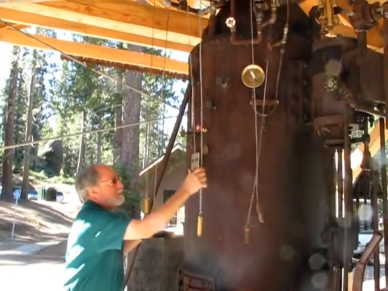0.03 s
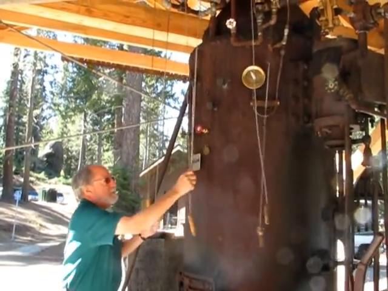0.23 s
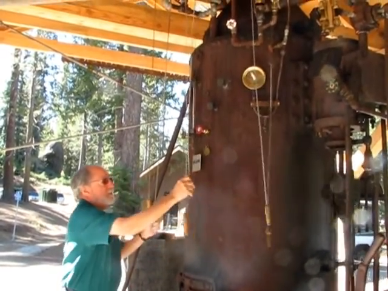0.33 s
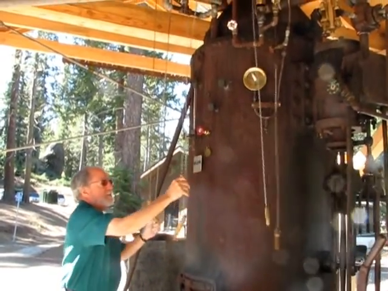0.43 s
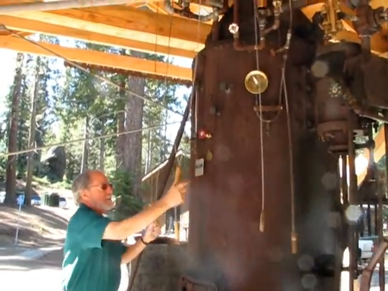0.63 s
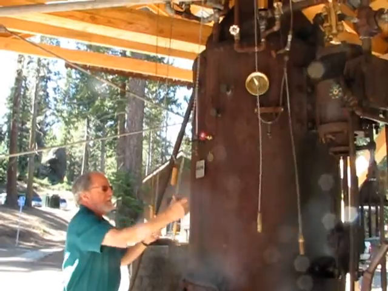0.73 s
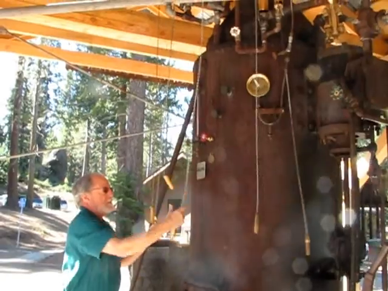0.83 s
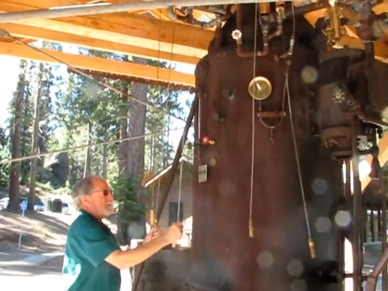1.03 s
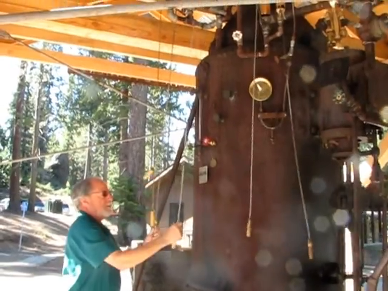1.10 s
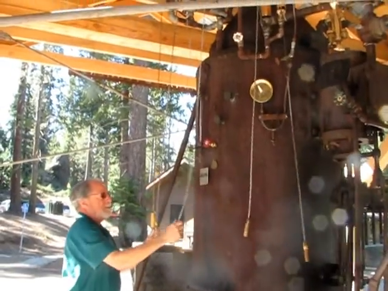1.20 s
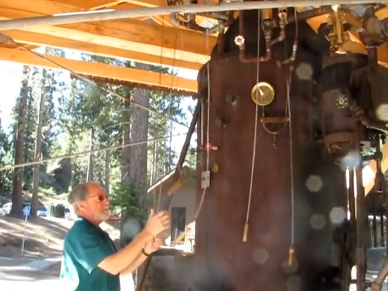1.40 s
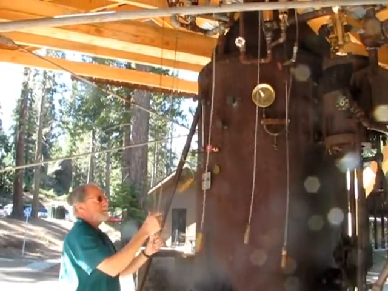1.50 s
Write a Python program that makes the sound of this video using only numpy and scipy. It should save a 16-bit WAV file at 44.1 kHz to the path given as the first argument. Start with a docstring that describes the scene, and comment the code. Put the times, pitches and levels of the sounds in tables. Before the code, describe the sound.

Wet steam gurgles and hisses, then two short whistle toots sound, the first chordal, the second higher and purer. Each leaves a trembling echo under an open shed in woods, captured by a slightly distorting small microphone.

```python
"""Two steam-whistle blasts

An old upright boiler under an open shed among trees: a three-bell chime, then a single brighter whistle.
Bells are sums of harmonics with a bending, trembling pitch; steam jets and wet sputter are shaped noise.
Each tone lingers in shed and forest as a fluttering, decaying copy of its harmonics.
The sum overloads a small camera's input, which samples coarsely and limits the band.
"""
import sys
import numpy as np
from scipy import signal
from scipy.fft import rfft, irfft
from scipy.io import wavfile

SR = 44100
rng = np.random.default_rng(int(sys.argv[2]) if len(sys.argv) > 2 else 0)


def log_audio(samples):
    """Write samples as a 16-bit WAV file to the path given in sys.argv[1]."""
    # one column per channel
    frames = np.atleast_2d(samples).T
    # limit to full scale, then quantise
    limited = np.clip(frames, -1, 1)
    pcm = np.round(limited * 32767).astype(np.int16)
    wavfile.write(sys.argv[1], SR, pcm)


N = 68355
T = np.arange(N) / SR


def amp(db):
    """Decibels to gain."""
    return 10 ** (np.asarray(db) / 20)


def unit(x):
    """Scale to rms 1."""
    return x / np.sqrt(np.mean(abs(x) ** 2) + 1e-20)


def colour(x, points):
    """Filter by (frequency [Hz], gain [dB]) points, joined on a log frequency axis."""
    hz, db = np.transpose(points)
    bins_hz = np.fft.rfftfreq(N, 1 / SR)
    gain_db = np.interp(np.log1p(bins_hz), np.log1p(abs(hz)), db)
    return irfft(rfft(x) * amp(gain_db), N)


def drift(rate_hz):
    """Smooth random motion of rms 1, up to about the given rate."""
    lowpass = 1 / (1 + (np.fft.rfftfreq(N, 1 / SR) / rate_hz) ** 4)
    return unit(irfft(rfft(rng.standard_normal(N)) * lowpass, N))


def noise(points, skirts=False):
    """Noise of rms 1 with the given spectrum; skirts make it fade beyond the end points."""
    if skirts:
        points = [(points[0][0] / 2, -70), *points, (points[-1][0] * 2, -70)]
    return unit(colour(rng.standard_normal(N), points))


def after(start_s):
    """Seconds gone since start_s, 0 before."""
    return np.maximum(T - start_s, 0)


def rise(start_s, time_s):
    """Smooth climb from 0 to 1."""
    return 1 - np.exp(-(after(start_s) / time_s) ** 2.0)


def swell(middle_s, length_s):
    """One soft arch, peak 1."""
    return np.cos(np.pi * np.clip((T - middle_s) / length_s, -.5, .5))


# outdoor rumble spectrum: (frequency [Hz], level [dB per Hz])
RUMBLE_SPECTRUM = [(15, -3), (40, -3), (90, -15.5), (200, -16), (600, -29.5)]
RUMBLE_DB = -48.5


def rumble():
    """Steady low outdoor noise."""
    return amp(RUMBLE_DB) * noise(RUMBLE_SPECTRUM)


# steam noise as heard, lower while a whistle sounds: (time [s], low sputter [dB], middle [dB], hiss [dB])
STEAM_LEVELS = [(0, -48.5, -43.5, -47), (.04, -33, -36.5, -43), (.12, -34, -38.5, -48),
                (.17, -29.5, -34, -42), (.24, -27.5, -28, -43), (.31, -24, -31, -41),
                (.345, -37.5, -32, -48), (.59, -45, -45, -60), (.625, -55.5, -51, -60),
                (.74, -47.5, -46.5, -53), (.835, -50, -48, -49.5), (.855, -39.5, -40, -52),
                (.94, -38, -42.5, -44.5), (1.0, -38.5, -37.5, -48), (1.055, -33.5, -30, -49),
                (1.08, -54, -43.5, -55), (1.359, -52.5, -53, -51.5), (1.43, -44.5, -48, -52.5),
                (1.52, -43.5, -49.5, -49), (1.54, -42.5, -34.5, -46.5)]
# spectra of the three steam bands: (frequency [Hz], level [dB per Hz])
SPUTTER_SPECTRUM = [(20, -18), (60, -14), (110, -8.5), (165, -0.5), (230, -5), (310, 0), (450, -4.5),
                    (700, -13.5), (2000, -54.5)]
MIDDLE_SPECTRUM = [(200, -40), (450, -8), (640, -4), (900, -10), (1250, -6), (1600, -12), (2200, -19),
                   (5000, -44.5)]
HISS_SPECTRUM = [(700, -28), (1600, -7), (2300, 1.5), (3200, -5), (4500, -6), (5500, -9), (8000, -24)]


def steam(flicker_db=1.25):
    """Wet steam noise in three bands with one shared flicker; its level drops while a whistle sounds."""
    time_s, *band_levels_db = np.transpose(STEAM_LEVELS)
    spectra = (SPUTTER_SPECTRUM, MIDDLE_SPECTRUM, HISS_SPECTRUM)
    flicker = flicker_db * drift(61)
    return sum(amp(np.interp(T, time_s, db) + flicker) * noise(spectrum)
               for db, spectrum in zip(band_levels_db, spectra))


# wet spits: (middle [s], length [s], centre [Hz], half width to -10 dB [octaves], peak level [dB])
WATER_SPITS = [(0.34, .026, 4120, 0.66, -31), (.858, 0.039, 1120, .2, -43), (1.043, .045, 197, .6, -33),
               (1.04, 0.031, 1300, 0.51, -36), (1.059, .007, 5650, .15, -28.5), (0.26, 0.18, 90, 0.55, -41),
               (1.232, .025, 78, 0.79, -48)]


def spits():
    """Slugs of water burst through the valve: arches of band noise."""
    out = np.zeros(N)
    for middle_s, length_s, hz, width_oct, db in WATER_SPITS:
        band = [(hz / 4 ** width_oct, -20), (hz, 0), (hz * 4 ** width_oct, -20)]
        out += amp(db) * swell(middle_s, length_s) * noise(band, skirts=True)
    return out


def brief_tones(rows, waver):
    """Brief unsteady sines, each under one soft arch; waver is the rms share of pitch."""
    out = np.zeros(N)
    for middle_s, length_s, hz, db in rows:
        turns = np.cumsum(hz * (1 + waver * drift(90))) / SR
        out += amp(db) * swell(middle_s, length_s) * np.sin(2 * np.pi * turns)
    return out


# faint bell tones: (middle [s], length [s], pitch [Hz], peak level [dB])
LEAKS = [(0.087, 0.21, 609, -32), (0.225, 0.13, 645, -24.5), (.235, 0.034, 1230, -26),
         (.285, .04, 1210, -32), (.21, 0.087, 805, -30.5), (1.015, .08, 1265, -38), (1.01, .14, 634, -41),
         (1.03, 0.34, 781, -39), (0.3015, 0.061, 460, -27.5)]


def leak_tones():
    """Leaking steam stirs the bells faintly."""
    return brief_tones(LEAKS, waver=.012)


# brief bell tones, chirps then flares: (middle [s], length [s], pitch [Hz], peak level [dB])
CHIRPS_AND_FLARES = [(.332, 0.015, 2600, -27), (.340, 0.014, 1180, -16), (.3425, .007, 2244, -20),
                     (.347, 0.02, 744, -12), (.356, .025, 1532, -31), (.628, .035, 1564, -20),
                     (.645, .055, 774, -25), (.62, 0.018, 868, -23), (1.239, 0.016, 2381, -12.5),
                     (1.26, .02, 783, -8.5), (1.273, 0.011, 2378, -17), (1.295, 0.069, 769, -28)]


def chirps_and_flares():
    """Brief bell tones: chirps as the valves open, flares near the bells' own pitches as they shut."""
    return brief_tones(CHIRPS_AND_FLARES, waver=0.0146)


# jets at the whistle mouths, chime then single: (open [s], shut [s], level before the fade [dB])
MOUTH_JETS = [(0.325, 0.599, -21.5), (1.049, 1.238, -28.5)]
# their spectra: (frequency [Hz], level [dB per Hz])
CHIME_JET_SPECTRUM = [(30, -21.5), (150, -12.5), (350, -9.5), (550, -1), (720, 8.5), (1000, -1.5),
                      (1400, 0.5), (2100, -4), (2700, -7.5), (4000, -15.5), (5500, -16.5), (8000, -34)]
SINGLE_JET_SPECTRUM = [(30, -10), (300, -9), (750, 3.5), (1100, -1), (1800, -8.5), (2250, 10), (2800, -6.5),
                       (4000, -2), (5500, -12), (8000, -17.5)]
JET_RISE_S, JET_FADE_DB_PER_S = 0.012, 222.5


def jets():
    """Steam roars across each whistle's lip while its valve is open."""
    out = np.zeros(N)
    for (open_s, shut_s, db), spectrum in zip(MOUTH_JETS, (CHIME_JET_SPECTRUM, SINGLE_JET_SPECTRUM)):
        level = amp(db - JET_FADE_DB_PER_S * after(shut_s)) * rise(open_s, JET_RISE_S)
        out += level * noise(spectrum) * amp(2.4 * drift(150))
    return out


SAG_S = .014


def bell_phase(start_s, shut_s, hz, scoop, scoop_s, sag, jitter, dying_jitter):
    """Pitch scoops up as pressure builds, trembles with the jet, sags and falters at shut-off."""
    # scoop, sag and jitters are shares of the pitch
    dying = rise(shut_s, SAG_S)
    bend = -scoop * np.exp(-after(start_s) / scoop_s) - sag * dying
    bend = bend + (jitter + dying_jitter * dying) * drift(130)
    turns = np.cumsum(hz * (1 + bend)) / SR
    return 2 * np.pi * (turns - turns[int((start_s + shut_s) / 2 * SR)])


FOREST_T60_S = 2.01


def lingering(shut_s, hz, shed_db, shed_t60_s, forest_db, arrival_s, flutter=0.53):
    """Shed and trees keep a fluttering, decaying tone after the bell has stopped."""
    gone_s = after(shut_s)
    shed = amp(shed_db - 60 * gone_s / shed_t60_s) * (1 + flutter * (drift(38) + 1j * drift(44)))
    forest = amp(forest_db - 60 * gone_s / FOREST_T60_S) * (1 + flutter * (drift(19.2) + 1j * drift(13)))
    carrier = np.exp(2j * np.pi * hz * gone_s)
    return rise(shut_s, arrival_s) * ((shed + 1j * forest) * carrier).real


# bells: (speaks [s], pitch [Hz], harmonic 1 [dB], 2 [dB], 3 [dB], 4 and 5 each [dB],
# forest echo of the fundamental [dB re harmonic], of the overtones [dB re harmonic])
CHIME_BELLS = [(.354, 634.5, -6.5, -35.5, -45, -56, -24, -27),
               (.340, 784.3, -15, -24, -29, -43, -19, -21.5),
               (.350, 877.4, -20, -21.5, -42, -55.5, -18, -26.5)]
CHIME_SHUT_S, CHIME_RELEASE_S, CHIME_SHED_T60_S = .608, 0.029, 0.22
CHIME_SAG = .003  # share of pitch


def chime():
    """Three bells sound a rough chord, each harmonic trembling in level."""
    out = np.zeros(N)
    for start_s, hz, first_db, second_db, third_db, upper_db, echo_db, overtone_echo_db in CHIME_BELLS:
        phase = bell_phase(start_s, CHIME_SHUT_S, hz, scoop=0.018, scoop_s=0.016,
                           sag=CHIME_SAG, jitter=0.0045, dying_jitter=.008)
        blow = rise(start_s, .007) * np.exp(-after(CHIME_SHUT_S) / CHIME_RELEASE_S)
        for k, db in enumerate((first_db, second_db, third_db, upper_db, upper_db), 1):
            tone = blow * np.cos(k * phase) * amp(.55 * drift(66))
            forest_db = echo_db if k == 1 else overtone_echo_db
            echo = lingering(CHIME_SHUT_S, k * hz, shed_db=-10.5, shed_t60_s=CHIME_SHED_T60_S,
                             forest_db=forest_db, arrival_s=.035)
            out += amp(db) * (tone + echo)
    return out


# harmonics 1 to 8: (level [dB], build-up [s], shed echo [dB re harmonic], forest echo [dB re harmonic])
SINGLE_HARMONICS = [(-10, 0.0024, -4.5, -18), (-17, 0.019, -15, -32.5), (-16, 0.024, -11.5, -17.5),
                    (-24, .045, -12, -34.5), (-35, 0.0067, -12, -23.5), (-47.5, .02, -11, -14.5),
                    (-30, 0.031, -16, -42), (-36, .04, -13, -29)]
SINGLE_OPEN_S, SINGLE_SHUT_S, SINGLE_HZ, SINGLE_SHED_T60_S = 1.056, 1.231, 809.8, 0.23
SINGLE_SAG = .0359  # share of pitch
KICK, KICK_S = .9, .008  # first gush overblows the fundamental: extra share, decay time


def single():
    """One bell kicks in nearly pure, gains harmonics; its sagging end beats with its own echo."""
    phase = bell_phase(SINGLE_OPEN_S, SINGLE_SHUT_S, SINGLE_HZ, scoop=0.061, scoop_s=0.0096,
                       sag=SINGLE_SAG, jitter=.0018, dying_jitter=.013)
    out = np.zeros(N)
    for k, (db, build_s, shed_db, forest_db) in enumerate(SINGLE_HARMONICS, 1):
        release_s = .03 if k in (1, 3) else .008  # closed pipe holds its low odd modes longest
        blow = rise(SINGLE_OPEN_S, build_s) * np.exp(-after(SINGLE_SHUT_S) / release_s)
        if k == 1:
            blow = blow * (1 + KICK * np.exp(-after(SINGLE_OPEN_S) / KICK_S))
        tremble_db = (.4 + 1.8 * rise(SINGLE_SHUT_S, SAG_S)) * drift(80)
        tone = blow * np.sin(k * phase) * amp(tremble_db)
        echo = lingering(SINGLE_SHUT_S, k * SINGLE_HZ, shed_db, SINGLE_SHED_T60_S, forest_db, arrival_s=.006)
        out += amp(db) * (tone + echo)
    return out


def scene():
    """Rumble, steam and whistles, summed to one channel."""
    background = rumble() + steam() + spits()
    whistles = leak_tones() + chirps_and_flares() + jets() + chime() + single()
    return (background + whistles)[None]


# input filter, run before and after sampling: (frequency [Hz], gain per pass [dB])
INPUT_BAND = [(0, 0), (4800, 0), (5500, -3), (6000, -11), (6500, -24), (7000, -40), (7600, -70),
              (22050, -100)]
CLIP_LEVEL, CLIP_KNEE, CLIP_BIAS = 0.38, 3.71, 0.0067
SAMPLE_STEP, EDGE_HZ = 4, 7100  # keeps every 4th sample


def record(dry):
    """Input overloads softly; coarse sampling mirrors the top harmonics; filters limit the band."""
    x = dry[0] + CLIP_BIAS
    x = x / (1.5 + abs(x / CLIP_LEVEL) ** CLIP_KNEE) ** (1 / CLIP_KNEE) - CLIP_BIAS
    pulses = SAMPLE_STEP * (np.arange(N) % SAMPLE_STEP == 0)
    x = colour(colour(x, INPUT_BAND) * pulses, INPUT_BAND)
    lowpass = signal.firwin(255, EDGE_HZ, window=("kaiser", 9), fs=SR)
    return signal.oaconvolve(x, lowpass, "same")[None]


dry = scene()
out = record(dry)
log_audio(out)
```